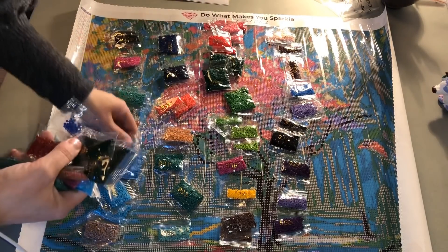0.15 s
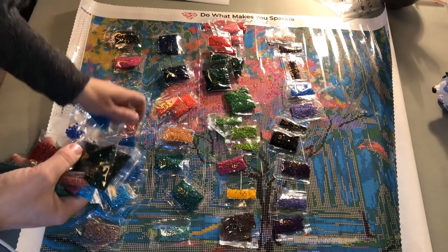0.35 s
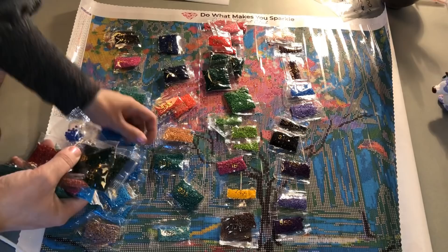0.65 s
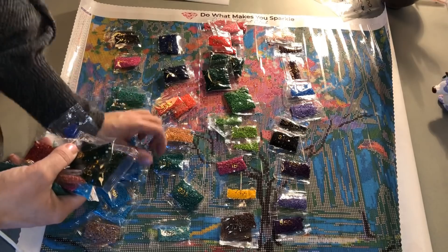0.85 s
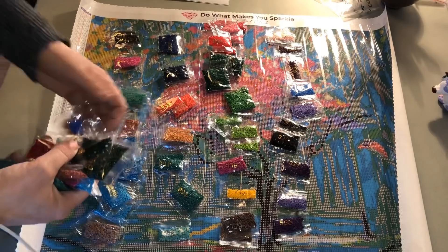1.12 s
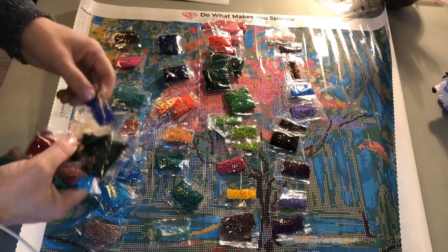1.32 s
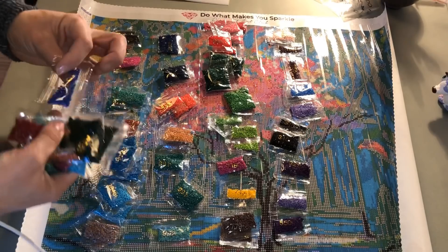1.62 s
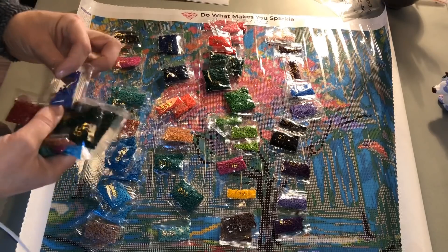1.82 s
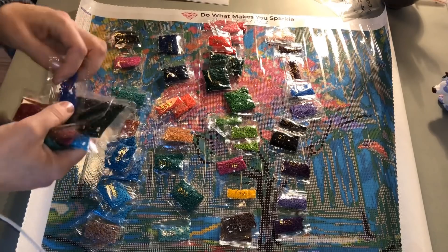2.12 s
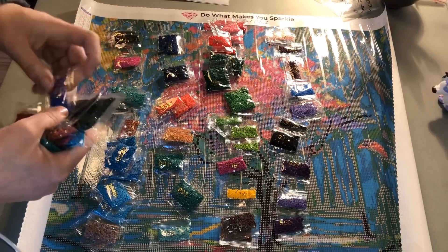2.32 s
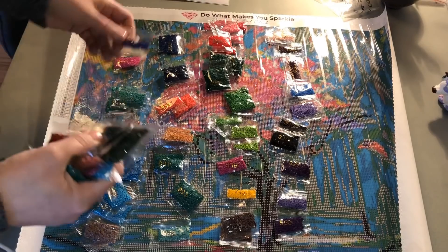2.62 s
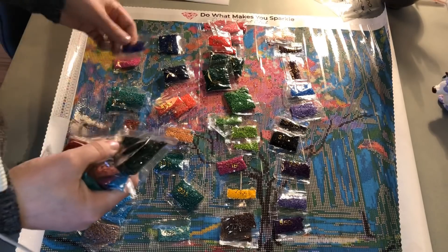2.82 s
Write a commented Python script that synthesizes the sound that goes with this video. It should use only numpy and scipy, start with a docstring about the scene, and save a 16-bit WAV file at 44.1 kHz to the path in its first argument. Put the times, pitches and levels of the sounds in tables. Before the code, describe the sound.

Small plastic bags of beads crinkle as hands sort them, lightly at first, then in busier clusters of sharp snaps and crunches. Bags knock softly on the table, close to the microphone in a small, quiet room.

```python
"""A small, quiet room, one microphone close to a table where hands sort small plastic bags of beads.
Creases in the film snap one by one over a fine crinkle; gripped bags crunch in dense grains.
Bags rub along the mat and knock softly, ringing the table. Underneath, the hands bump dully
and the moving arms stir the air at the microphone."""
import sys
import numpy as np
from scipy import signal
from scipy.fft import rfft, irfft
from scipy.io import wavfile
from scipy.ndimage import uniform_filter1d

SR = 44100
rng = np.random.default_rng(int(sys.argv[2]) if len(sys.argv) > 2 else 0)


def generate_wav(signal):
    """Clip the signal to [-1, 1] and save it as 16-bit WAV at the path in sys.argv[1]."""
    frames = np.transpose(np.atleast_2d(signal))
    scaled = np.clip(frames, -1, 1) * 32767
    pcm = np.round(scaled).astype(np.int16)
    wavfile.write(sys.argv[1], SR, pcm)


N = 130095
GRAIN_HZ, TOP_HZ = 5750, 16050
# colour of the crinkling film: f/Hz, level/dB
FILM_COLOUR = [(350, 10), (800, 13), (1400, 6), (2300, 1), (4500, -0.5), (7000, 2), (9500, 4), (12000, 1.5),
               (16000, -8.5)]


def amp(db):
    """Decibels to gain."""
    return 10 ** (np.asarray(db) / 20)


def unit(x):
    """Scales to energy 1."""
    return x / np.sqrt(np.sum(x ** 2) + 1e-20)


def read(points, hz):
    """Reads a curve on a log-frequency axis."""
    f, value = np.transpose(points)
    return np.interp(np.log(hz + 1), np.log(f + 1), value)


def level(points):
    """Gain over time from points of t/s, level/dB."""
    return amp(np.interp(np.arange(N) / SR, *np.transpose(points)))


def add(mix, s, sound):
    """Mixes a sound in at time s."""
    part = mix[max(round(s * SR), 0):][:len(sound)]
    part += sound[:len(part)]


def causal(db):
    """Sharpest causal pulse with the given half spectrum in dB."""
    log_gain = np.log(amp(np.r_[db, db[-2:0:-1]]))
    return np.fft.ifft(np.exp(np.conj(signal.hilbert(log_gain)))).real


def colour(x, points):
    """Filters by a spectrum without blurring attacks."""
    return signal.oaconvolve(x, causal(read(points, np.fft.rfftfreq(2048, 1 / SR))))[:N]


def noise(points):
    """Noise of rms 1 with the given spectrum."""
    gain = amp(read(points, np.fft.rfftfreq(N, 1 / SR)))
    return np.sqrt(N) * unit(irfft(rfft(rng.standard_normal(N)) * gain, N))


def rings(rows):
    """Each blow rings briefly at one pitch."""
    out, t = np.zeros(N), np.arange(SR // 5) / SR
    for s, db, hz, decay in rows:
        envelope = np.exp(-t / decay) * (1 - np.exp(-t * hz))
        add(out, s, amp(db) * unit(np.sin(2 * np.pi * hz * t) * envelope))
    return out


def room_tone():
    """The room's low hush, slowly fading."""
    # colour of the hush: f/Hz, level/dB
    hush_colour = [(30, 10.5), (160, -4.5), (350, -3), (800, -7.5), (1500, -15.5), (4000, -21),
                   (10000, -22.5), (16000, -33)]
    # its fade: t/s, level/dB
    hush_level = [(0, -64), (1.2, -66), (2.95, -70)]
    return level(hush_level) * noise(hush_colour)


def reflections(x, count=12, early_s=0.016, early_db=-17.5, tail_db=-11.5):
    """A few near reflections reach the microphone, then a short diffuse tail."""
    # reverberation time: f/Hz, t60/s
    room_t60 = [(200, 0.51), (700, 0.12), (1800, 0.39), (4600, 0.18), (12000, 0.14), (16000, 0.27)]
    hz, t, spectra = signal.stft(rng.standard_normal(SR // 2), SR, nperseg=256)
    decay = amp(-60 * t / read(room_t60, hz)[:, None])
    tail = signal.istft(spectra * decay, SR, nperseg=256)[1]
    tail *= np.minimum(np.arange(len(tail)) / SR / 0.0047, 1)
    early = np.zeros(len(tail))
    for s in rng.uniform(0.0019, early_s, count):
        add(early, s, rng.choice([-1, 1], 1) * np.exp(-s / early_s))
    return signal.fftconvolve(x, amp(tail_db) * unit(tail) + amp(early_db) * unit(early))[:N]


def room(x, count=3):
    """The reflections change as the hands move about: a crossfade that cycles once a second."""
    turn = np.arange(N) / SR * 2 * np.pi
    fades = [np.cos(turn + np.pi * k / count) * np.sqrt(2 / count) for k in range(count)]
    return sum(reflections(x * fade) for fade in fades)


def stirred_air():
    """Moving arms push air at the microphone: a slow, deep rumble."""
    # swell of the draught: t/s, level/dB
    air_level = [(0, -56), (.7, -46), (.95, -45.5), (1.3, -51), (1.9, -53), (2.25, -43.5), (2.6, -48),
                 (2.95, -59.5)]
    # its colour: f/Hz, level/dB
    air_colour = [(10, 1), (25, -11.5), (50, -24.5), (90, -36.5), (200, -92), (16000, -110)]
    return level(air_level) * noise(air_colour)


def hand_bumps():
    """The hands bump softly, each time with a low, damped ring."""
    # bumps: t/s, level/dB, f/Hz, decay/s
    bumps = [(0.885, -25.5, 81, 0.01), (2.07, -15.5, 37.4, 0.029), (2.18, -13.5, 48.6, 0.023),
             (2.242, -17, 134, 0.0044), (2.3, -15, 51.3, .03)]
    return rings(bumps)


def bag_rub(width_hz=130):
    """Friction drives one narrow resonance that sinks as a bag is dragged along the mat."""
    # the hollow note: t/s, f/Hz, level/dB
    glide = [(0.331, 849, -74), (0.353, 767.4, -61.5), (.388, 730, -61), (.412, 557, -65), (.44, 400, -78)]
    s, hz, db = np.transpose(glide)
    t = np.arange(N) / SR
    lowpass = signal.butter(2, width_hz / 2, fs=SR, output="sos")
    friction = signal.sosfilt(lowpass, rng.standard_normal(N) + 1j * rng.standard_normal(N))
    phase = 2 * np.pi * np.cumsum(np.interp(t, s, hz)) / SR
    note = (friction * np.exp(1j * phase)).real
    return np.sqrt(N) * unit(note) * amp(np.interp(t, s, db)) * (t > s[0]) * (t < s[-1])


def table_knocks(spots=4, split_hz=550):
    """The beads in a bag land in a quick scatter; each spot of the table rings a little differently."""
    # bags landing: t/s, low ring level/dB, high ring level/dB, contact/s
    landings = [(0.383, -40, -28.5, 0.0012), (1.414, -27, -30.5, 0.0027), (1.533, -32.5, -35, 0.004),
                (1.59, -27.5, -32, 0.011), (1.85, -34, -26.5, 0.0056), (2.151, -29.5, -44, 0.027),
                (2.242, -23.5, -20, 0.0041), (2.357, -25, -34, 0.037), (2.454, -27, -27.5, 0.0029),
                (2.472, -24, -26.5, 0.016), (2.515, -28, -25, 0.012)]
    # modes of table and mat: f/Hz, level/dB, t60/s
    modes = [(255, -4, 0.022), (353, -1, 0.11), (474, 3, 0.039), (596, -2, 0.059), (780, 2.5, 0.057),
             (922, -1.5, 0.12), (1260, -23, 0.0047)]
    out, t = np.zeros(N), np.arange(SR // 10) / SR
    for s, low_db, high_db, contact in landings:
        push = rng.standard_normal(len(t)) * np.exp(-t / contact)
        detune = 2 ** (rng.uniform(-0.93, 1, (spots, 1)) / 2 / np.pi)
        for db, is_low in ((low_db, True), (high_db, False)):
            ring = np.zeros(len(t))
            for k, (hz, mode_db, t60) in enumerate(modes):
                if (hz < split_hz) == is_low:
                    tone = np.sin(2 * np.pi * hz * detune * t).sum(0)
                    ring += (-1) ** k * amp(mode_db - 60 * t / t60) * tone
            add(out, s, amp(db) * unit(signal.fftconvolve(push, ring)))
    return out


def pop(hz, octaves, skirt_db=-18):
    """One crease flipping: a pulse of a cycle or two around hz."""
    away = np.log2((np.fft.rfftfreq(256, 1 / SR) + 1) / hz) / octaves
    return unit(causal(20 * np.log10(np.exp(-away ** 2 / 2) + amp(skirt_db))))


def flexing(x, depth_db=1.8):
    """The film's resonances wander as it changes shape; rms 1."""
    spectra = signal.stft(x, nperseg=256)[2]
    patches = uniform_filter1d(rng.standard_normal(spectra.shape), size=4, axis=0)
    patches = uniform_filter1d(patches, size=8, axis=1)
    gain = amp(depth_db * patches / patches.std())
    return np.sqrt(N) * unit(signal.istft(spectra * gain, nperseg=256)[1][:N])


def grains(per_s, spread_db, pitches=24, scatter_octaves=0.47):
    """A steady shower of tiny pops of mixed pitch and size, rms 1."""
    out, t = np.zeros(N), np.arange(300) / SR
    for offset in np.linspace(-1, 1, pitches) * np.sqrt(3):
        sizes = amp(spread_db * np.minimum(rng.exponential(1, N), 4)) * rng.choice([-1, 1], N)
        train = sizes * (rng.random(N) < per_s / pitches / SR)
        shiver = 1.4 * unit(rng.standard_normal(len(t)) * np.exp(-t / 0.0035))
        shiver[0] += 1  # the opening click
        pulse = pop(GRAIN_HZ * 2 ** (offset * scatter_octaves), octaves=0.86)
        out += signal.oaconvolve(train, np.convolve(shiver, pulse))[:N]
    return np.sqrt(N) * unit(colour(out, FILM_COLOUR))


def film_crinkle(slide_db=-38.5, lift_s=2.6, body_hz=2900, lifted_body_db=-11):
    """Gentle bending mostly slides, harder bending crackles, a grip crunches; a lifted bag thins."""
    # bending of the film: t/s, level/dB
    bends = [(0, -64), (.07, -82), (.19, -79), (.27, -57.5), (.32, -73), (.45, -57), (.57, -64), (.79, -73),
             (.93, -56.5), (.99, -68), (1.05, -91), (1.23, -81), (1.26, -57), (1.32, -54), (1.36, -62.5),
             (1.44, -52.5), (1.50, -59.5), (1.58, -58), (1.66, -60), (1.73, -76.5), (1.81, -66.5),
             (1.87, -54.5), (1.94, -49), (2.055, -64), (2.08, -50), (2.14, -55), (2.21, -53), (2.43, -59.5),
             (2.6, -56.5), (2.63, -65), (2.69, -65), (2.76, -58), (2.87, -51.5), (2.95, -72)]
    # crunches of a gripped bag: peak t/s, level/dB, rise/s, fall/s
    crunches = [(0.384, -45.5, 0.025, 0.013), (0.81, -51.5, 0.0088, 0.023), (1.248, -47.5, 0.0039, 0.0056),
                (1.271, -46, 0.0076, 0.0031), (1.538, -46, 0.0048, 0.025), (1.959, -34.5, 0.0026, 0.011),
                (2.158, -44, .003, 0.017), (2.246, -28.5, 0.00091, 0.0045), (2.379, -45.5, 0.015, 0.013),
                (2.481, -41, 0.019, 0.015), (2.517, -40, 0.0026, 0.012), (2.528, -46.5, 0.0016, 0.023)]
    t, bending = np.arange(N) / SR, level(bends)
    grip = sum(amp(db) * np.exp(-np.maximum((s - t) / rise, (t - s) / fall))
               for s, db, rise, fall in crunches)
    hiss = signal.oaconvolve(rng.standard_normal(N), pop(GRAIN_HZ, octaves=1.63))
    slide = amp(slide_db) * np.sqrt(bending) * flexing(colour(hiss, FILM_COLOUR))
    crackle = bending * flexing(grains(per_s=800, spread_db=4.5))
    crunch = grip * flexing(grains(per_s=6000, spread_db=3))
    film = slide + crackle + crunch
    body = signal.sosfiltfilt(signal.butter(2, body_hz, fs=SR, output="sos"), film)
    body_gain = level([(lift_s - .05, 0), (lift_s, lifted_body_db)])
    return film + body * (body_gain - 1)


def bag_pings():
    """A bag rings clearly: high where it is taut, hollow where it lands."""
    # pings: t/s, level/dB, f/Hz, decay/s
    pings = [(0.511, -32.5, 970, 0.0041), (1.248, -21, 5200, 0.0016), (1.32, -31, 533, 0.0058),
             (1.385, -23, 377, 0.0034), (1.407, -21.5, 490, 0.0027), (1.45, -31, 2300, 0.0011),
             (2.249, -8, 9470, 0.0016), (2.513, -20, 1195, 0.0014), (2.513, -19, 378, 0.0035),
             (2.7006, -27, 3350, 0.00051)]
    return rings(pings)


def crease_snaps(panels=7, scatter_octaves=0.542, panel_decay_s=0.0022, flutter_s=0.0085):
    """Each pop sets the film fluttering and rings a few of its panels for some milliseconds."""
    # creases popping: t/s, relative level/dB, centre f/Hz, flutter trim/dB
    creases = [(0.0905, -30, 4500, -6.5), (0.2343, -35, 6280, 9), (0.286, -27.5, 6600, -3.5),
               (0.4825, -27.5, 5070, 2), (0.5122, -32, 6440, 5.5), (0.654, -39.5, 4840, 3),
               (0.7558, -30.5, 8140, -17), (.805, -37.5, 2080, 1.5), (0.8304, -20.5, 9200, -1),
               (.882, -35.5, 2220, 2), (0.89, -40, 4900, 11.5), (0.9247, -38, 5150, 7.5),
               (1.017, -41, 6140, 3), (1.2486, -25, 5670, 4), (1.2719, -20.5, 5440, 1.5),
               (1.3098, -23.5, 7100, 1.5), (1.3608, -30.5, 4870, 0.5), (1.386, -32, 6330, 11),
               (1.4011, -8.5, 6240, -1.5), (1.402, -13.5, 10400, 0.5), (1.4159, -25, 7600, 8),
               (1.4408, -22.5, 7300, -5), (1.4499, -23, 3760, -14), (1.5335, -19.5, 10620, 4),
               (1.591, -31, 6760, 8.5), (1.6058, -8, 9840, -4), (1.715, -34.5, 6800, -2.5),
               (1.821, -30.5, 6300, -1), (1.8518, -19.5, 7130, -2), (1.866, -26.5, 6400, 3),
               (1.8993, -15, 7150, 0), (1.9015, -10, 4440, -13.5), (1.9301, -21, 6700, -3),
               (1.9975, -26, 6430, -2), (2.068, -33, 4830, 7), (2.1063, -27, 4570, -7),
               (2.118, -26.5, 5940, 1), (2.1265, -29, 4200, -20), (2.1498, -26.5, 7600, 5),
               (2.1952, -24.5, 5060, 6.5), (2.1975, -15, 6030, -20), (2.2128, -16.5, 6900, -9),
               (2.2489, -4.5, 8240, -4), (2.2919, -31, 2670, -4), (2.3328, -25, 4020, 2.5),
               (2.38, -27, 8900, -1), (2.3904, -15.5, 6700, -3), (2.4532, -6.5, 4450, -9),
               (2.4579, -14.5, 7260, 2), (2.514, -17.5, 4300, 1.5), (2.7006, -20.5, 5700, -14.5),
               (2.743, -21, 7660, -2), (2.7592, -19.5, 7500, -2), (2.8001, -20, 9000, -10),
               (2.8154, -17, 8200, -5.5), (2.8412, -23.5, 7400, -17), (2.8961, -18.5, 11700, -19)]
    # colour over all the snaps: f/Hz, level/dB
    snap_colour = [(100, -10.5), (400, 1.5), (1000, 1), (2200, 2), (4500, -3), (7000, -2.5), (9500, 2.5),
                   (12000, -1), (16000, -18)]
    out, t = np.zeros(N), np.arange(1200) / SR
    envelope = (1 - np.exp(-t / 0.00014)) * (np.exp(-t / flutter_s) + 1.6 * np.exp(-t / 0.00041))
    for s, db, hz, flutter_db in creases:
        shiver = rng.standard_normal(len(t)) * rng.exponential(1, len(t)) ** .5 * envelope
        flutter = unit(np.convolve(shiver, pop(hz * 1.025, octaves=1.35))[:len(t)])
        panel_hz = np.minimum(hz * 2 ** (scatter_octaves * rng.standard_normal((panels, 1))), TOP_HZ)
        ring = unit(np.sin(2 * np.pi * panel_hz * t).sum(0) * np.exp(-t / panel_decay_s))
        add(out, s, amp(db - 4.5) * rng.choice([-1, 1]) * pop(hz, octaves=0.37))
        add(out, s, amp(db + 2.5 + flutter_db) * unit(flutter + amp(-3) * ring))
    return colour(out, snap_colour)


def scene():
    """Bags and table up close, the room faint behind them; mono."""
    bags = crease_snaps() + bag_pings() + film_crinkle() + table_knocks() + bag_rub()
    return (bags + room(bags) + hand_bumps() + stirred_air() + room_tone())[None]


def record(dry):
    """The recorder cuts the treble above TOP_HZ."""
    lowpass = signal.firwin(127, TOP_HZ, window=("kaiser", 9), fs=SR)
    return signal.oaconvolve(dry, lowpass[None], "same")


dry = scene()
out = record(dry)
generate_wav(out)
```